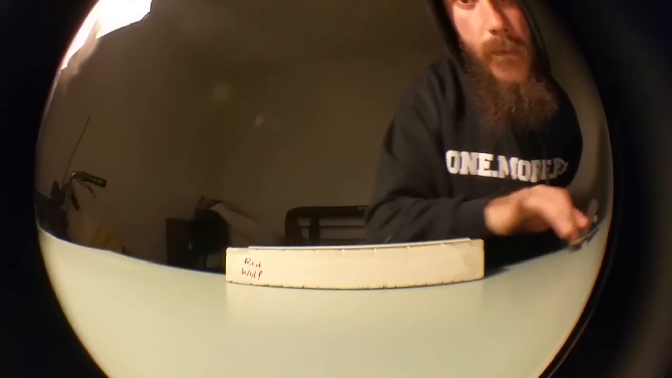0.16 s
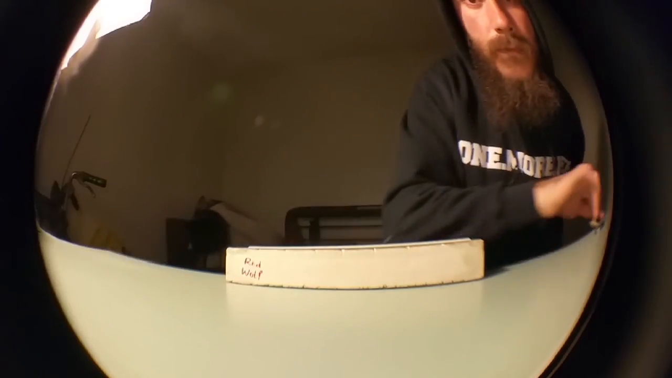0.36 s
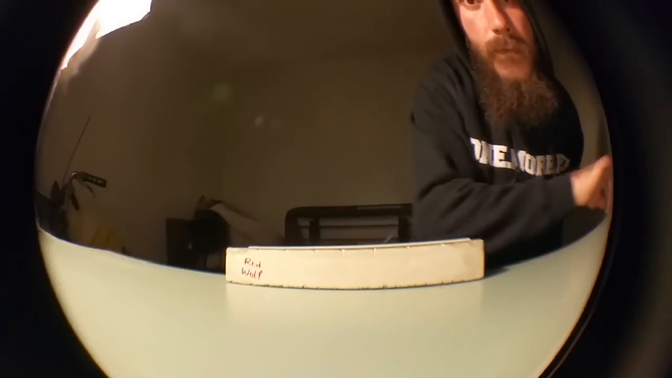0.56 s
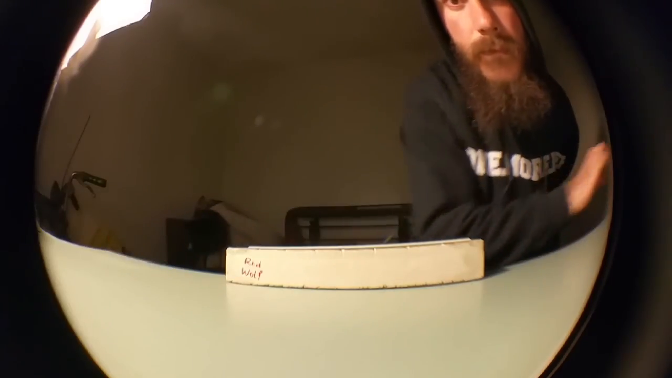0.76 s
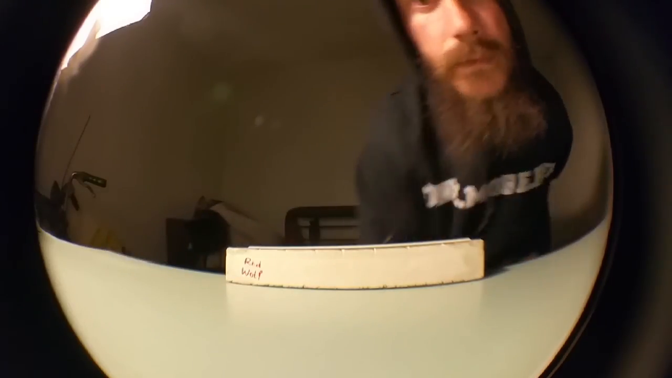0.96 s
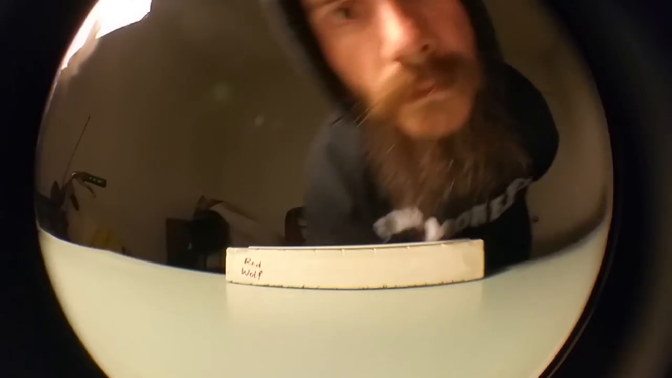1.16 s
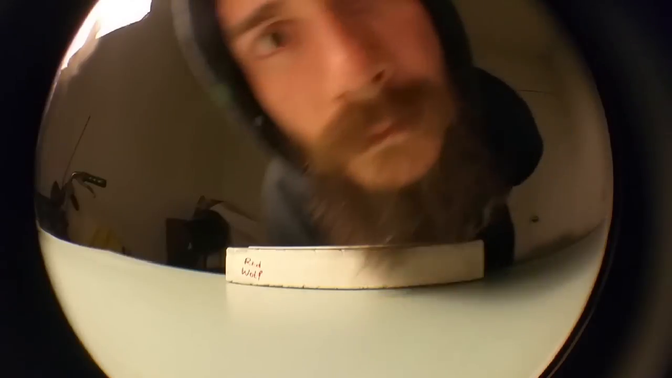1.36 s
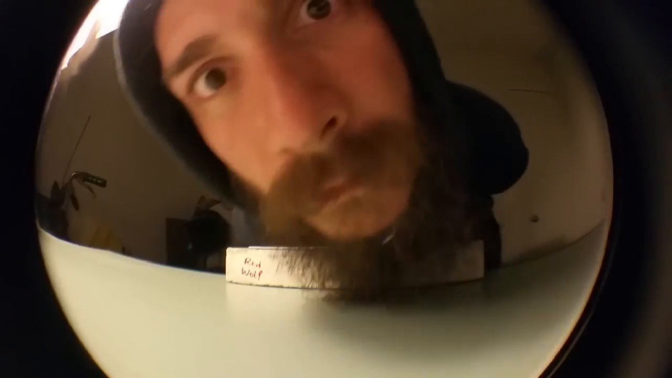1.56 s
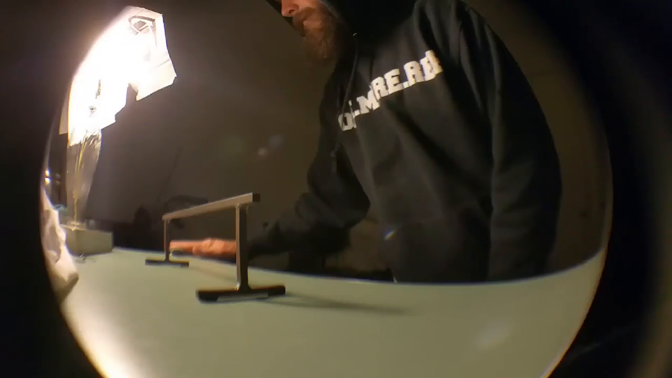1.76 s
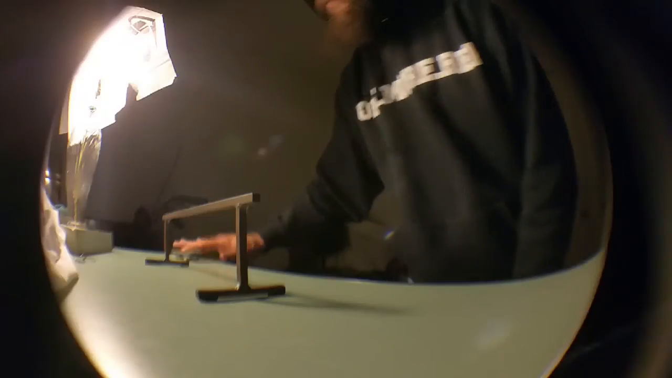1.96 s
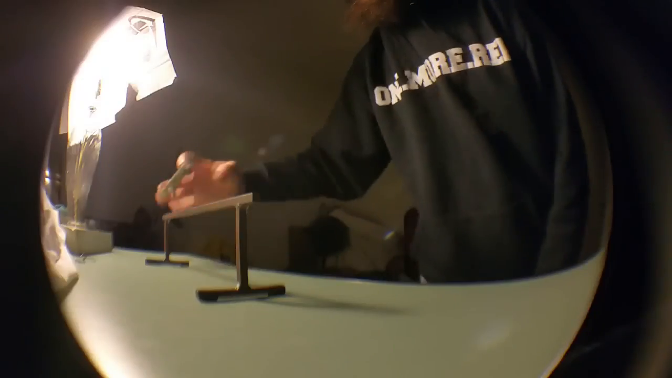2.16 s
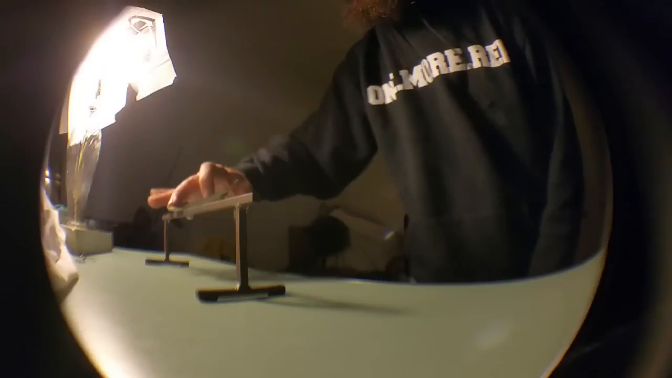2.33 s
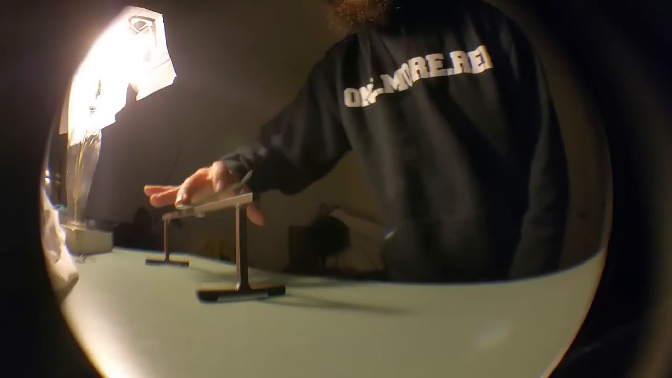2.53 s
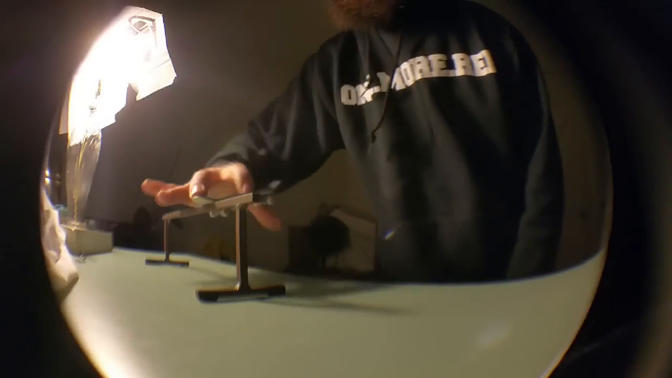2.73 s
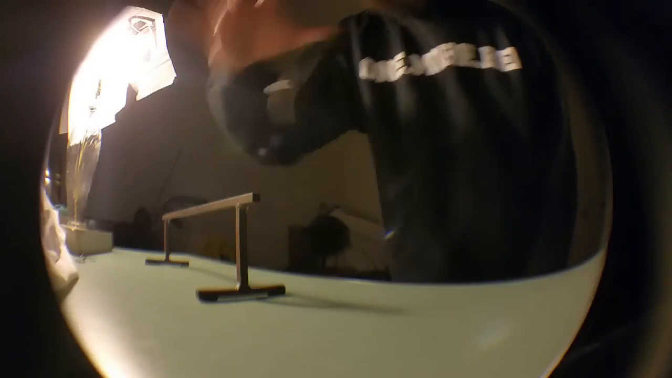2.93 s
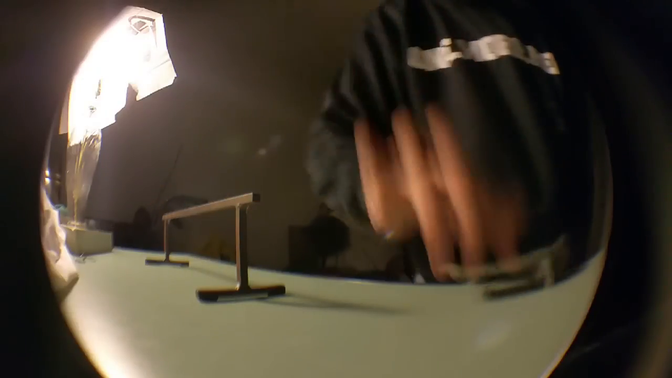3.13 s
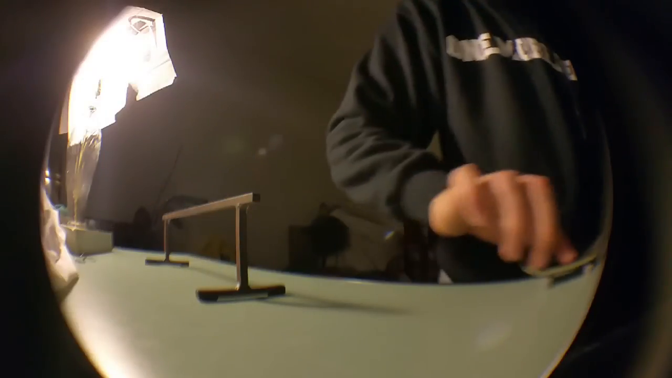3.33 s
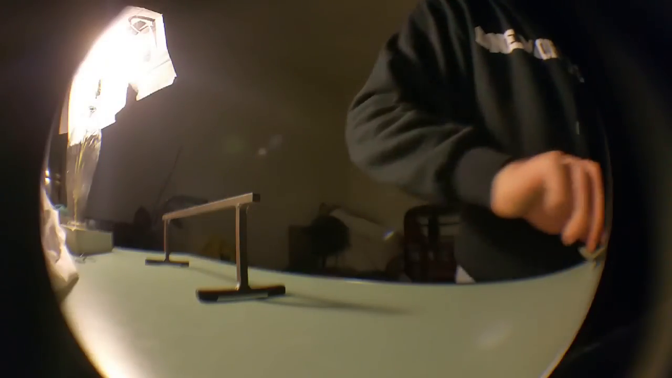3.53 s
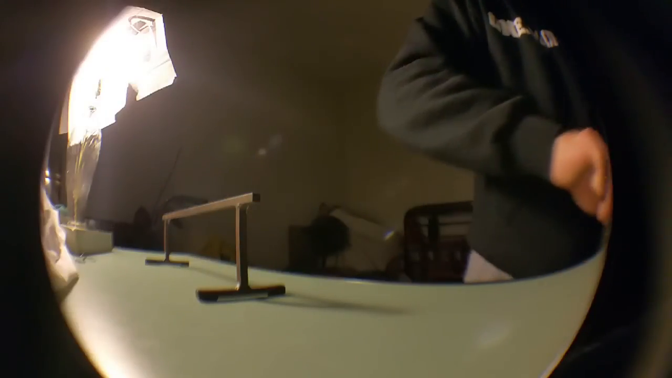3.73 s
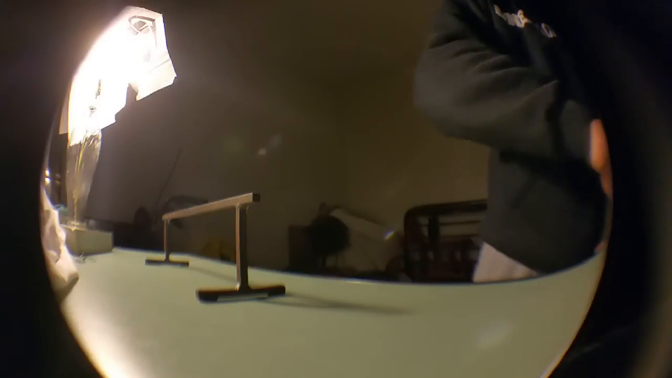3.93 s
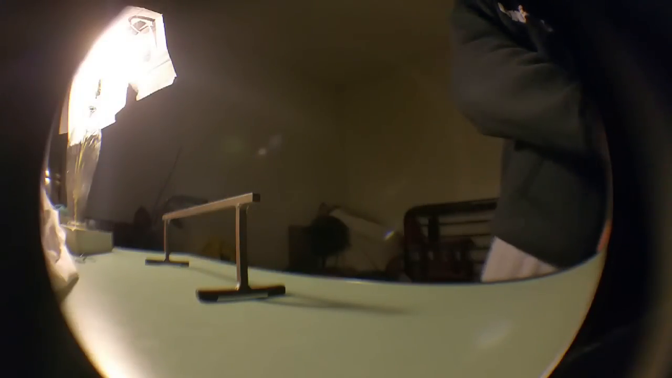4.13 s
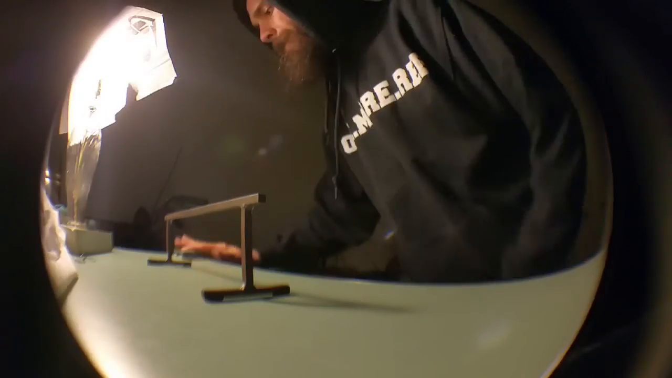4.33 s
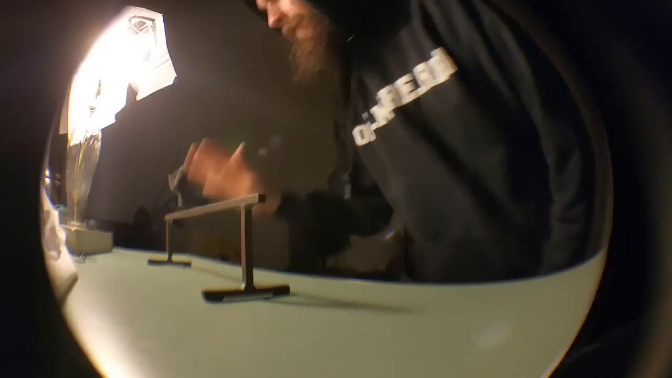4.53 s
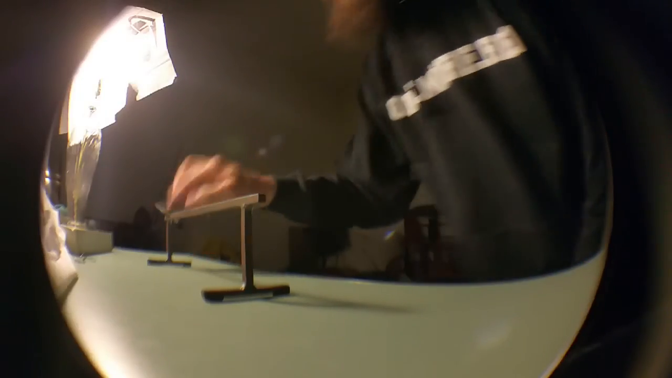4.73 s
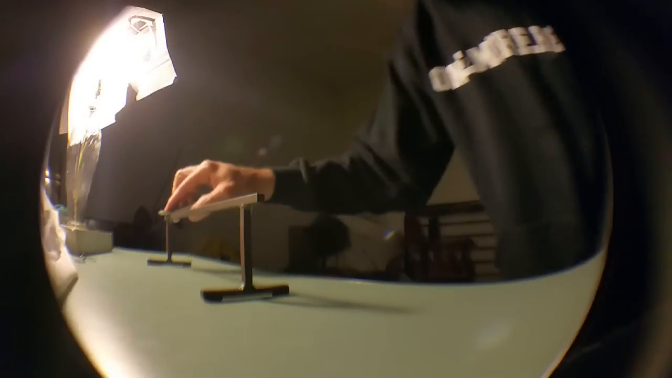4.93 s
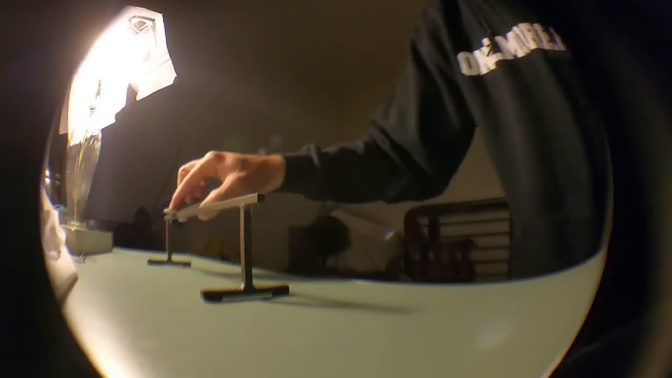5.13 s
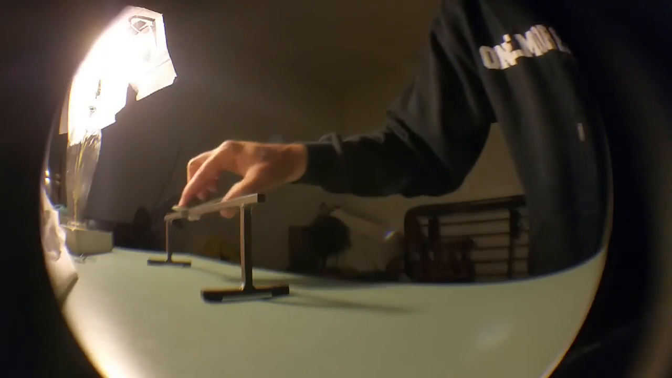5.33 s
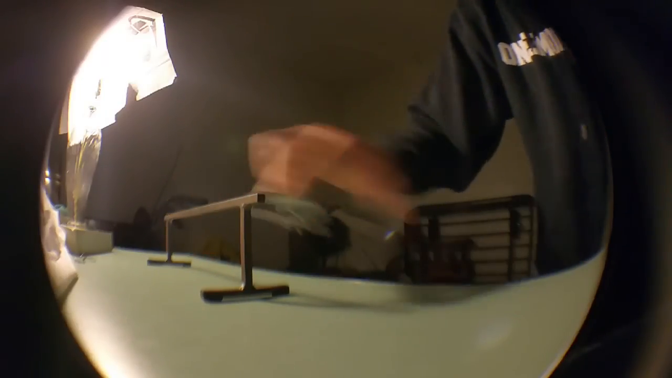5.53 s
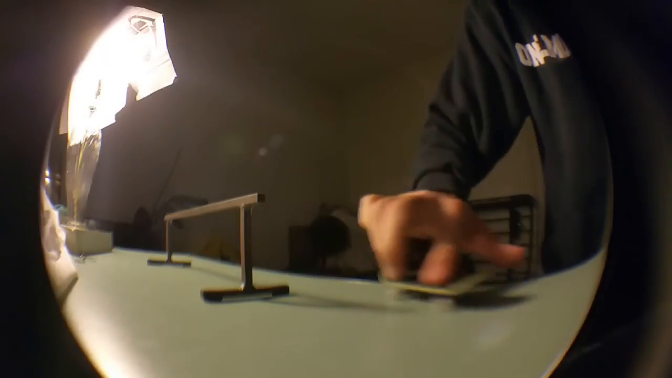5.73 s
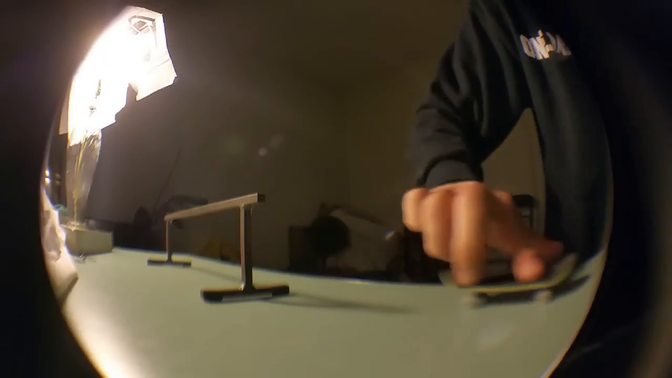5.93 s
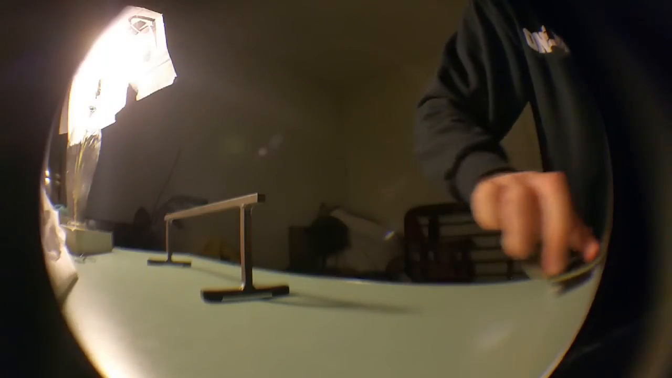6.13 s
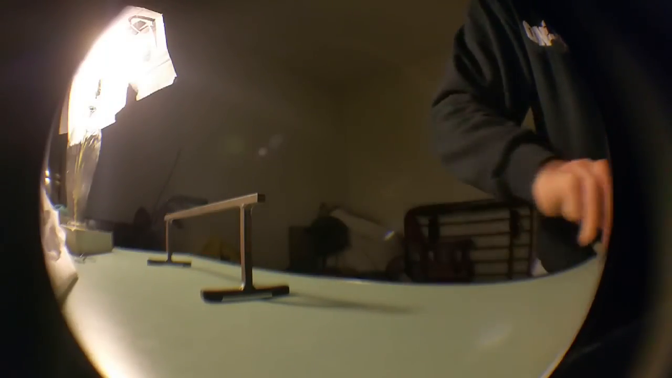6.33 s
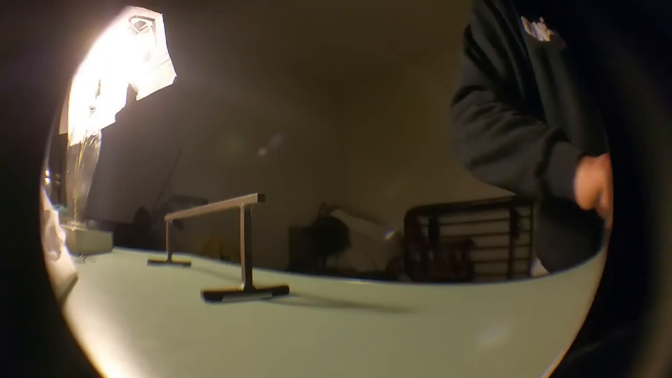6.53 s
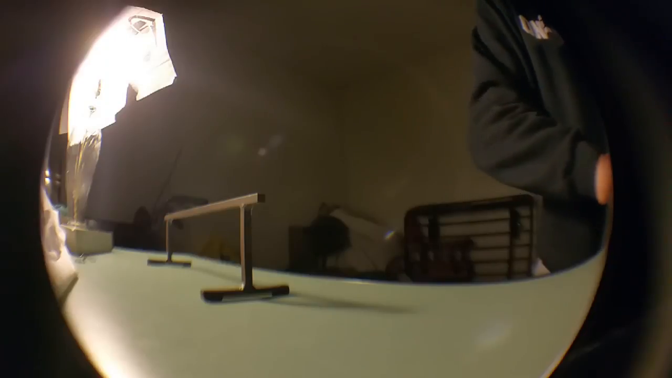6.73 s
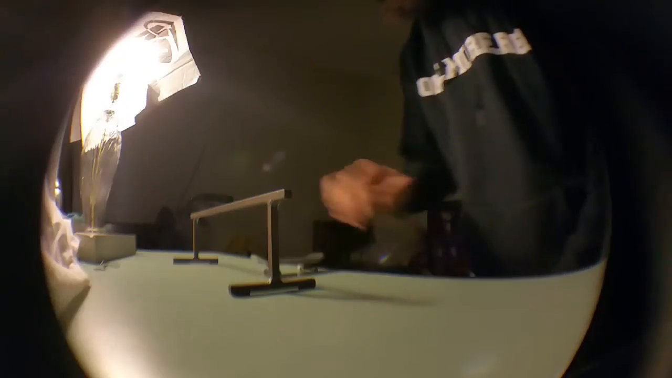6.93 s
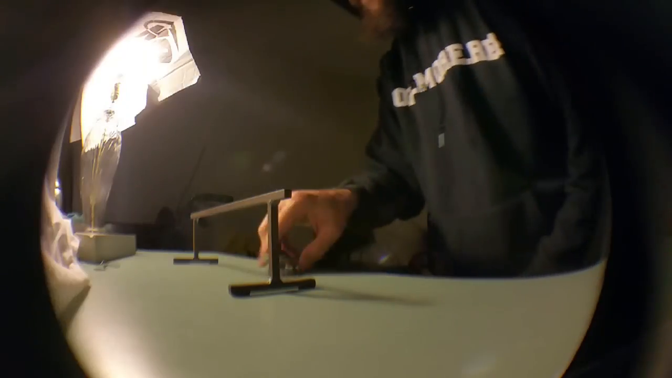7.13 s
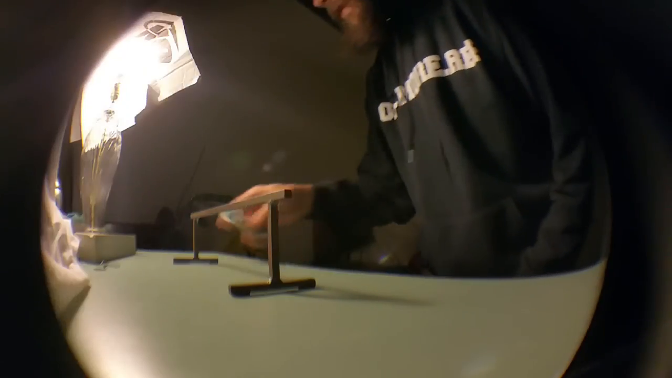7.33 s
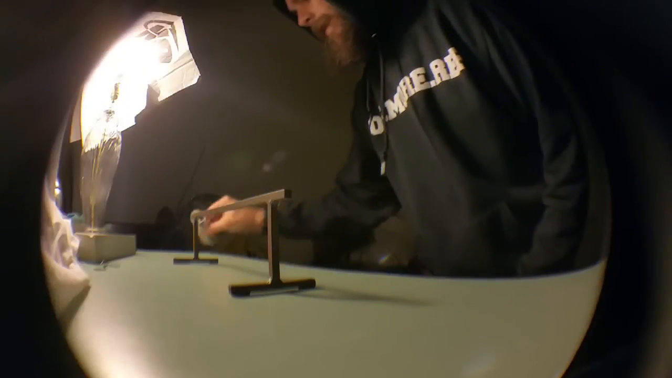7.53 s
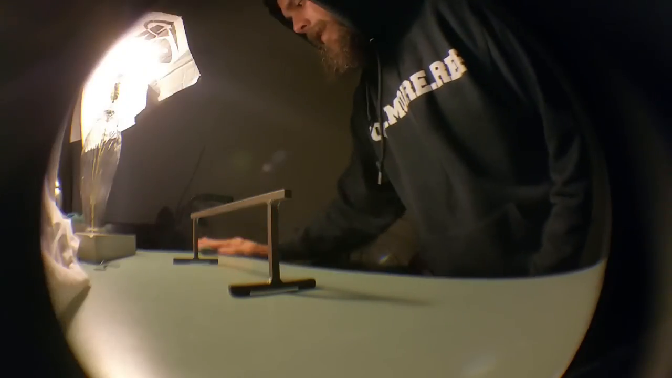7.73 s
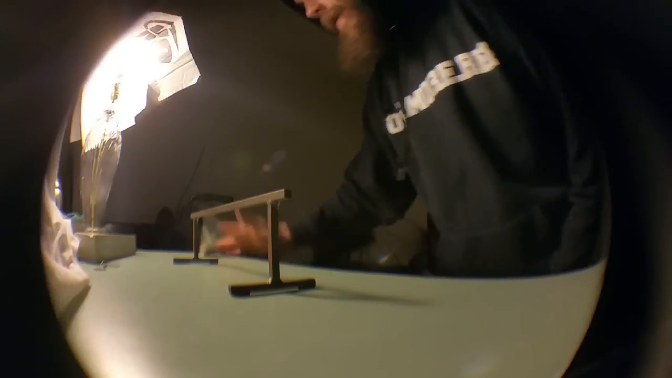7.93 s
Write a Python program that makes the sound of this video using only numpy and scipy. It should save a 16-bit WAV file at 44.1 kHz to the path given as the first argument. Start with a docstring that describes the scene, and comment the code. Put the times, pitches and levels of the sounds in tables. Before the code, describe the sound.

Two microphones lying on the table catch a miniature skateboard: dry snaps with woody deck knocks and table thumps, low drumming of tiny wheels with crunchy grit, short finger scuffs and faint rail ring. Four attempts are joined by hard cuts that chop the room tails. Rolling fades toward the right; the last attempt stops right after a pop, over quiet murmur and hiss.

```python
"""A finger-sized skateboard rolls on a tabletop, pops, lands on a small steel rail and drops back, in four attempts
joined end to end. Noise with random specks drums table and deck and crunches as grit in wheels and axles.
Every contact is a snap with short chatter, a knock of the deck and a thump of the table; friction scuffs, and
rail and ledge ring as decaying sines. Two spaced microphones lie on the table in a small hard room, where
decaying noise makes the reflections and a low murmur with treble hiss makes the hush."""
import sys
import numpy as np
from scipy import signal
from scipy.fft import rfft, irfft, next_fast_len
from scipy.io import wavfile
from scipy.ndimage import uniform_filter1d, map_coordinates

SR = 44100
rng = np.random.default_rng(int(sys.argv[2]) if len(sys.argv) > 2 else 0)


def waveform_to_disk(signal):
    """Save audio, clipped to [-1, 1], as 16-bit WAV at the path in sys.argv[1]."""
    frames = np.transpose(np.atleast_2d(signal))
    scaled = np.clip(frames, -1, 1) * 32767
    samples = np.round(scaled).astype(np.int16)
    wavfile.write(sys.argv[1], SR, samples)


N = 356306

# starts of the attempts and the end [t/s]
ATTEMPT_EDGES = [0, 1.65, 4.194, 6.865, 8.1]
# where the board is [t/s, delay of the left microphone/ms]
BOARD_PLACE = [(0, -.07), (.14, 0.26), (.3, 0.44), (1.36, 0.47), (1.42, -0.0097), (1.7, -0.229),
               (2.9, -0.24), (3.1, 0.35), (3.25, 0.15), (3.65, .45), (4.2, 0.43), (4.21, -.2),
               (5.55, -0.27), (5.67, 0.016), (6.15, 0.25), (6.4, 0.39), (6.86, 0.53), (6.87, 0.1),
               (7.2, -0.072), (8.08, -0.2)]

# Strokes: lists of curves [t/s, relative drumming level/dB, relative grit level/dB].
# wheels rolling away after a landing [t/s, drumming level/dB, grit level/dB]
ROLLS_AWAY = [
    [(.41, -48, -57.5), (.5, -42, -55.5), (.72, -42.5, -60), (.82, -52, -55), (.9, -46.5, -54),
     (1.08, -48.5, -59.5), (1.13, -42.5, -63), (1.19, -72, -81), (1.28, -56, -97)],
    [(3.28, -36.5, -50), (3.358, -44, -56), (3.462, -39, -52), (3.57, -42.5, -57), (3.7, -43.5, -52.5),
     (3.79, -41, -49.5), (3.952, -47.5, -56.5), (4.185, -46, -57)],
    [(5.73, -32, -35.5), (5.83, -39.5, -42), (5.946, -42.5, -51), (6.1, -43, -53), (6.356, -42.5, -49),
     (6.55, -44, -53.5), (6.7, -48, -59), (6.855, -48.5, -61.5)],
]
# the hard push that leads to a pop [t/s, drumming level/dB, grit level/dB]
POP_PUSHES = [
    [(1.8, -40.5, -60), (1.864, -42.5, -61.5), (1.94, -33, -49.5), (1.99, -28, -35.5), (2.02, -28, -45),
     (2.05, -50, -48), (2.085, -35.5, -42)],
    [(4.29, -51, -50), (4.334, -38, -51), (4.412, -28.5, -41.5), (4.436, -42, -73), (4.464, -37.5, -59),
     (4.49, -62, -42)],
    [(7.765, -33, -33), (7.79, -27, -43), (7.83, -31, -41.5), (7.907, -29.5, -36.5), (7.955, -45, -70),
     (7.975, -31, -58), (7.99, -71, -65)],
]
# the board rubbing along the rail [t/s, drumming level/dB, grit level/dB]
RAIL_GRINDS = [
    [(2.16, -52, -60), (2.218, -58, -55), (2.29, -62, -62), (2.31, -61, -55)],
    [(2.4, -45, -58), (2.488, -47, -62), (2.628, -46.5, -58.5), (2.698, -65, -62.5), (2.73, -46.5, -62.5),
     (2.892, -57, -58.5), (3.0, -78.5, -76.5)],
    [(4.93, -54, -58), (4.982, -60, -62.5), (5.204, -47.5, -63.5), (5.25, -65, -69), (5.574, -59.5, -60.5),
     (5.598, -82, -92), (5.63, -78, -78)],
]
# quiet rattles after hits, and fingers handling the board [t/s, drumming level/dB, grit level/dB]
RATTLES_AND_HANDLING = [
    [(0.0, -49, -38), (0.02, -54, -52), (0.028, -46, -38.5), (0.082, -71, -86), (0.1, -67, -73)],
    [(0.18, -41, -63), (0.206, -40.5, -52.5), (0.364, -49, -72), (0.4, -45, -62)],
    [(1.32, -58.5, -41), (1.378, -60.5, -84), (1.45, -68, -78), (1.53, -61, -59.5), (1.64, -57, -61.5)],
    [(1.67, -43, -73), (1.676, -54, -68), (1.694, -66.5, -69), (1.724, -38.5, -64), (1.735, -48, -65)],
    [(4.58, -57, -67), (4.644, -76, -69.5), (4.656, -64, -75), (4.662, -79.5, -81.5), (4.68, -83, -102)],
    [(7.17, -56, -55.5), (7.212, -50, -53), (7.23, -53, -53), (7.314, -66, -59), (7.69, -66, -72.5)],
    [(8.04, -50, -53), (8.062, -45, -55), (8.08, -56, -54)],
]
# mixes of each kind of stroke [tabletop, deck: level over drumming/dB; wheels, axles, fizz: level over grit/dB]
MIX_ROLL = (6, 0.5, -3.5, -2.5, -13)
MIX_FIRST_ROLL = (3, 4, 1, -3.5, -11.5)  # same columns: more deck and less tabletop
MIX_PUSH = (-5.5, 6.5, 2, -2.5, -8.5)  # same columns
MIX_GRIND = (-0.5, -2, -2, 2, 2)  # same columns
MIX_RATTLES_AND_HANDLING = (3.5, 0, -2.5, -1.5, -7.5)  # same columns
# how far each level follows the grit rather than the drumming [tabletop, deck, wheels, axles, fizz: share]
GRIT_SHARE = (0.0, .25, .85, 1.0, 1.05)
EDGE_S, OFF_DB = 0.015, -100  # each stroke fades in from this level and out to it

# resonances of the tabletop [f/Hz, width/Hz, level/dB]
TABLE_MODES = [(39, 33, -21.5), (61.6, 57, -9.5), (126, 37, -3), (161.7, 25, -0.5), (241.4, 59, -0.5),
               (294.8, 34.4, 1), (378.7, 42, 1), (480, 39, -0.5), (622.7, 39, -0.5), (696.6, 12, 2.5),
               (888, 100, -0.5)]
# resonances of the deck [f/Hz, width/Hz, level/dB]
DECK_MODES = [(598.4, 92, -3), (787.4, 86, -1), (995, 260, -3.5), (1106, 150, 0), (1297, 74, -1),
              (1476, 81, -4), (1694, 84, -8.5), (1870, 56, -7.5), (2005, 62, -6.5), (2117, 39, -15),
              (2340, 110, -10), (2980, 59, -10.5), (2985, 130, -16)]
# resonances of the wheels [f/Hz, width/Hz, level/dB]
WHEEL_MODES = [(1964, 760, -2.5), (2946, 535, 9), (3114, 740, 8), (3835, 665, 1)]
# resonances of the axles [f/Hz, width/Hz, level/dB]
AXLE_MODES = [(4780, 980, -1.5), (5648, 317, 6), (6045, 670, 1.5), (7420, 980, -4.5)]
# resonances of the highest treble [f/Hz, width/Hz, level/dB]
FIZZ_MODES = [(8940, 1800, 2), (11730, 900, 6), (12810, 2800, 2.5), (15800, 400, -19.5)]
# faint note while fingers turn the deck; the end levels hold [t/s, level/dB]
TURNING_NOTE = [(7.26, -104), (7.33, -66), (7.6, -72), (7.68, -75)]
TICKS_PER_S, FIZZ_TICK_DB, AXLE_TICK_DB = 110, 5, -2  # small random ticks in fizz and axles

# contacts of wheels, tail and axles, before the resonances; all but the first level are relative to it
# [t/s, level/dB, thump level/dB, knock level/dB, knock f/Hz, brightness level/dB]
BOARD_CONTACTS = [(0.0265, -25.5, -5.5, -25, 2130, -17), (0.127, -26.5, -1.5, -12, 1880, -8),
                  (0.14, -8.5, -9.5, -20, 830, -15), (0.1544, -17.5, -17.5, -5, 840, -11.5),
                  (0.7771, -43.5, -10, 10.5, 2350, -27), (.829, -24, -7, -10.5, 2110, -13),
                  (0.8616, -42.5, 1, 5.5, 2170, -23), (1.0938, -26.5, -18.5, -5, 2000, -12.5),
                  (1.1089, -39.5, 10.5, 7, 850, -23), (1.3109, -38, -3, -28, 2370, -1),
                  (2.0973, -8.5, -16.5, -15.5, 796, -14), (2.3234, -15, -3, -41, 2470, -13.5),
                  (2.3344, -16, -6.5, -7, 840, -6.5), (3.2004, -24, 1, -27, 1400, -16),
                  (3.203, -6, -13, -7, 593, -13.5), (3.2274, -17.5, -1.5, -26.5, 820, -8),
                  (3.235, -12, -14.5, -10.5, 975, -13), (3.2372, -14, -15.5, -12.5, 950, -17),
                  (3.258, -32.5, -15, 4, 865, -21), (4.2243, -21.5, -35, -8, 1830, -9),
                  (4.2533, -13, -11, -0.5, 2030, -10.5), (4.5014, -12, -14.5, -16, 1440, -13),
                  (4.785, -10, -4.5, -20, 844, -17.5), (4.8207, -7.5, -9, -22, 800, -21.5),
                  (4.8631, -26.5, 6, -5.5, 786, -17), (4.8704, -43, -3.5, -26, 842, -12),
                  (5.395, -60.5, 17.5, -20.5, 880, -24), (5.4995, -46.5, 3.5, -10.5, 2200, -13),
                  (5.5647, -46, -30, -4.5, 1290, -17), (5.6659, -15.5, -11.5, -10, 2350, -8),
                  (5.6735, -4.5, -14, -11, 616, -16.5), (5.6773, -11.5, -10, -6, 990, -17.5),
                  (7.1408, -40.5, 5.5, -10, 802, -9.5), (7.1454, -22.5, -4, -10.5, 2010, -18),
                  (7.1574, -36.5, -7, 9.5, 2310, -15), (7.269, -34.5, -21, -30, 2340, -10.5),
                  (7.5076, -47.5, -3, -21.5, 1870, -10), (7.7109, -17.5, -21, -12, 2060, -15),
                  (7.7422, -5.5, -30, -10, 890, -13.5), (8.0056, -9, -12.5, -14, 784, -11)]
# loud specks under the wheels, before the resonances [t/s, level/dB]
WHEEL_SPECKS = [(3.5934, -34), (3.6385, -35.5), (3.6656, -39.5), (3.7, -47), (3.718, -33.5), (3.761, -34),
                (3.799, -41), (3.8166, -41), (4.0692, -37.5), (5.9574, -31.5), (6.055, -38), (6.144, -35),
                (6.3013, -37), (6.37, -32), (6.441, -33), (6.612, -35), (6.6706, -47), (6.717, -46)]
CHATTER_T60_S, SPECK_T60_S = 0.012, 0.0033
SNAP_S = 0.0011  # the chatter builds up this long before the snap
PAN_DB_PER_MS, PAN_SCATTER_DB = -24, 5  # a contact leans to the nearer microphone

# ring of the ledge as the board leaves it [f/Hz, level/dB, t60/s]
LEDGE_MODES = [(2200, -33, 0.1), (3060, -42, .07)]
LEDGE_S = 0.029
# short scuffs of the deck under the fingers, before the resonances [t/s, relative level/dB, length/s]
DECK_SCUFFS = [(1.649, -44, 0.027), (1.742, -23.5, 0.022), (1.766, -19.5, 0.019), (2.06, -23.5, 0.026),
               (2.43, -39, 0.023), (2.585, -39, 0.025), (2.624, -37.5, 0.022), (2.709, -38, 0.022),
               (2.735, -37.5, 0.064), (4.317, -26, 0.03), (5.171, -39.5, 0.033), (7.05, -65, .03),
               (7.085, -59.5, .03), (7.19, -48, 0.04), (7.221, -38, 0.021)]
# steel ring of the rail [f/Hz, t60/s]
RAIL_MODES = [(3770, 1), (4950, 1), (7050, 0.44), (8600, 0.27)]
# touches on the rail [t/s, level/dB, f that the spot favours/Hz]
RAIL_TOUCHES = [(2.874, -65.5, 3944), (4.821, -62, 8680), (4.93, -64.5, 4950), (5.58, -82.5, 6840)]

# room decay and reflections [f/Hz, t60/s, level/dB]
ROOM_WALLS = [(100, 0.41, -4.5), (705, 0.18, 1), (4800, 0.27, -7.5), (13120, 0.2, -4.5)]
# balance of the reflections [f/Hz, left over right level/dB]
ROOM_LEAN = [(60, 0.5), (200, 4), (600, 0.5), (4000, -5)]
# left-right likeness of diffuse sound [f/Hz, likeness]
DIFFUSE_LIKENESS = [(60, 1), (130, 0.58), (300, 0.61), (700, 0.079), (2000, 0.18)]
# spectrum of the hush [f/Hz, relative level per Hz/dB]
HUSH_SPECTRUM = [(15, -22), (25, -1.5), (105, 0.5), (250, -10.5), (416, -14.5), (695, -24.5), (2000, -35.5),
                 (16000, -33.5)]
# gain on the treble of the hush in each attempt [level/dB]
HISS_GAINS = [4.5, 1, 2, -6.5]
AIR_DB, HISS_HZ = -58.5, 700  # hush level before the treble gain, and where that treble starts
TOP_HZ = 16000  # band limit


def amp(db):
    """Gain of a level in dB."""
    return 10 ** (np.asarray(db) / 20)


def unit(x):
    """x at rms 1."""
    return x / np.sqrt(np.mean(x ** 2) + 1e-20)


def along(points, hz, column=1):
    """A column of (Hz, value, ..) points, read on a log frequency axis."""
    point_hz, *values = np.transpose(points)
    return np.interp(np.log(hz + 1), np.log(point_hz + 1), values[column - 1])


def curves(rows):
    """One value per sample for each column after the time."""
    s, *columns = np.transpose(rows)
    return [np.interp(np.arange(N) / SR, s, column) for column in columns]


def wobble(rate):
    """A smooth random curve with rate knots a second."""
    knots = rng.standard_normal(int(N * rate / SR) + 4)
    return map_coordinates(knots, [np.arange(N) * rate / SR])


def lean(db):
    """Left and right gains of a balance; positive leans left."""
    return amp([db / 2, -db / 2])


def filtered(x, response):
    """x shaped by a complex response of frequency."""
    n = x.shape[-1]
    size = next_fast_len(n + 8192)
    spectrum = rfft(x, size) * response(np.fft.rfftfreq(size, 1 / SR))
    return irfft(spectrum, size)[..., :n]


def body(modes):
    """Causal response of a set of damped resonances, alternating in polarity."""
    def response(f):
        total = 0
        for k, (hz, width, db) in enumerate(modes):
            resonance = width * 1j * f / (hz * hz - f * f + width * 1j * f)
            total = total + (-1) ** k * amp(db) * resonance
        return total
    return response


def diffuse(size, colour):
    """Two coloured noises whose left-right likeness depends on frequency, from shared mid and side parts."""
    def split(hz):
        angle = np.arccos(np.clip(along(DIFFUSE_LIKENESS, hz), -1, 1)) / 2
        return colour(hz) * [np.cos(angle), np.sin(angle)]
    mid, side = filtered(rng.standard_normal((2, size)), split)
    return np.array([mid + side, mid - side])


def bumps(rate, spread_db, share):
    """A rough surface: steady noise plus a share of specks of uneven size, rate a second."""
    sizes = amp(spread_db * np.minimum(rng.exponential(size=N), 3.5))
    specks = (rng.random(N) < rate / SR) * sizes
    burst = np.exp(-np.arange(80) / 11)
    crackle = signal.fftconvolve(specks, burst)[:N] * rng.standard_normal(N)
    return rng.standard_normal(N) + share * unit(crackle)


def strokes():
    """Levels of table, deck, wheels, axles and fizz: the power of all strokes, each kind with its own mix."""
    power, t = 0, np.arange(0, N / SR + 0.002, 0.002)
    kinds = [(ROLLS_AWAY[:1], MIX_FIRST_ROLL), (ROLLS_AWAY[1:], MIX_ROLL), (POP_PUSHES, MIX_PUSH),
             (RAIL_GRINDS, MIX_GRIND), (RATTLES_AND_HANDLING, MIX_RATTLES_AND_HANDLING)]
    for kind, mix in kinds:
        for rows in kind:
            fade_in = (rows[0][0] - EDGE_S, OFF_DB, OFF_DB)
            fade_out = (rows[-1][0] + EDGE_S, OFF_DB, OFF_DB)
            s, *columns = np.transpose([fade_in, *rows, fade_out])
            drum_db, grit_db = (np.interp(t, s, column) for column in columns)
            level_db = np.array(mix)[:, None] + drum_db + np.outer(GRIT_SHARE, grit_db - drum_db)
            power = power + amp(level_db) ** 2
    return curves(np.column_stack([t, 10 * np.log10(power).T]))


def rolling():
    """The rough surface shakes table, deck, wheels and axles; grit crackles most near the right microphone."""
    table_db, deck_db, wheel_db, axle_db, fizz_db = strokes()
    delay_ms, = curves(BOARD_PLACE)
    lumps = wobble(70)

    table_noise = unit(filtered(bumps(300, 3.0, share=0.64), body(TABLE_MODES)))
    table = amp(table_db - 7 + 0.3 * lumps) * table_noise
    deck_noise = unit(filtered(bumps(400, 2.2, share=0.63), body(DECK_MODES)))
    deck = amp(deck_db - 4 + 1.1 * lumps) * deck_noise

    grit = bumps(230, 2.4, share=0.8 + 2.8 * np.clip(delay_ms, 0, 1))
    wheels = amp(wheel_db - 1.5 + 1.4 * lumps) * unit(filtered(grit, body(WHEEL_MODES)))
    ticks = (rng.random(N) < TICKS_PER_S / SR) * rng.standard_normal(N)
    ticks = unit(ticks * np.clip(delay_ms + 0.1, 0, 0.35))
    axle_drive = unit(grit) + amp(AXLE_TICK_DB) * ticks
    axles = amp(axle_db - 3) * unit(filtered(axle_drive, body(AXLE_MODES)))

    # the hardest specks carry most of the highest treble
    hardest = unit(grit * np.abs(grit) ** 0.55) + amp(FIZZ_TICK_DB) * ticks
    fizz_response = lambda f: body(FIZZ_MODES)(f) * f ** 4 / (f ** 4 + 1600.0 ** 4)
    fizz = amp(fizz_db - 2) * unit(filtered(hardest, fizz_response))

    note_noise = unit(filtered(rng.standard_normal(N), body([(1880, 180, 0)])))
    note = amp(curves(TURNING_NOTE)[0]) * note_noise
    drone = table * lean(2.5)[:, None] + (deck + note) * lean(-4 * delay_ms)
    return drone, (wheels + axles + fizz) * lean(-14 * delay_ms)


def hush():
    """The quiet room: a low murmur of air, and a treble hiss that differs between attempts."""
    air_noise = unit(diffuse(N, lambda hz: amp(along(HUSH_SPECTRUM, hz))))
    air = amp(AIR_DB + 0.5 * wobble(19)) * air_noise
    hiss = filtered(air, lambda hz: hz ** 2 / (hz ** 2 + HISS_HZ ** 2))
    attempt = np.searchsorted(ATTEMPT_EDGES, np.arange(N) / SR, side="right") - 1
    return air - hiss + amp(np.take(HISS_GAINS, attempt)) * hiss


def knocked(db, spot_hz):
    """The deck rings as decaying sines, loudest in the modes that the struck spot favours."""
    t = np.arange(SR // 12) / SR
    ring = 0
    for hz, width, level_db in DECK_MODES:
        favour_db = -40 * abs(np.log(hz / spot_hz))
        decay = np.exp(-np.pi * 1.5 * width * t)
        ring = ring + amp(level_db + favour_db) * decay * np.sin(2 * np.pi * hz * t)
    return amp(db) * ring


def contacts():
    """Each contact is a snap with chatter in wheels and axles, a deck knock and a soft push into the table."""
    push, knock, hard, bright = np.zeros((4, 2, N + SR // 10))
    t = np.arange(SR // 40) / SR
    rows = [(*row, CHATTER_T60_S) for row in BOARD_CONTACTS]
    rows += [(s, db, -40, -20, 2000, -7, SPECK_T60_S) for s, db in WHEEL_SPECKS]
    delay_ms, = curves(BOARD_PLACE)
    for s, db, thump_db, knock_db, knock_hz, bright_db, t60 in rows:
        start = round(s * SR)
        at = slice(start, start + len(t))
        pan_db = PAN_DB_PER_MS * delay_ms[start] + PAN_SCATTER_DB * rng.standard_normal()

        chatter = rng.standard_normal(len(t)) * (1 - np.exp(-t / 0.00077)) * amp(-60 * t / t60)
        chatter[round(SNAP_S * SR)] = 3.6  # the snap
        chatter = amp(db) * chatter / np.abs(chatter).max() * lean(pan_db)[:, None]
        hard[:, at] += chatter
        bright[:, at] += amp(bright_db) * chatter

        ring = knocked(db + knock_db + 5.5, knock_hz) * lean(pan_db / 2)[:, None]
        knock[:, start:start + ring.shape[1]] += ring
        blow = t / 0.00046 * np.exp(-t / 0.00033) * rng.choice([-1, 1])
        push[:, at] += amp(db + thump_db) * blow * lean(3.2)[:, None]

    metal = lambda f: amp(18) * body(WHEEL_MODES)(f) - amp(13.5) * body(AXLE_MODES)(f)
    clack = filtered(hard, metal) + knock + amp(17.5) * filtered(bright, body(FIZZ_MODES))
    thump = amp(20) * filtered(push, body(TABLE_MODES))
    return (clack + thump)[:, :N]


def ledge():
    """The ledge gives a short clear ring of decaying sines as the board leaves it."""
    out, t = np.zeros(N), np.arange(SR // 4) / SR
    ring = sum(amp(db - 60 * t / t60) * np.sin(2 * np.pi * hz * t) for hz, db, t60 in LEDGE_MODES)
    out[round(LEDGE_S * SR):][:len(t)] = ring * (1 - np.exp(-t / 0.008))
    return out


def scuffs():
    """Grainy bursts of friction in the deck: a quick start and a slower end."""
    stroke = np.zeros(N + SR)
    for s, db, length in DECK_SCUFFS:
        progress = np.arange(round(length * SR)) / (length * SR)
        stroke[round(s * SR):][:len(progress)] += amp(db - 7) * np.sin(np.pi * progress ** 0.25)
    rubbing = stroke[:N] * bumps(820, 1.8, share=0.61)
    grain = filtered(rubbing, body(DECK_MODES + [(2310, 780, -15.5)]))
    return amp(15.5) * grain * lean(7)[:, None]


def rail():
    """The steel bar rings faintly when the axles touch it; the spot decides which mode sings."""
    out, t = np.zeros(N + SR), np.arange(SR) / SR
    for s, db, spot_hz in RAIL_TOUCHES:
        ring = 0
        for hz, t60 in RAIL_MODES:
            favour_db = -70 * abs(np.log(hz / spot_hz))
            ring = ring + amp(favour_db - 60 * t / t60) * np.sin(2 * np.pi * hz * t)
        out[round(s * SR):][:SR] += amp(db) * ring * (1 - np.exp(-t / 0.01))
    return out[:N]


def spaced(x):
    """The sound reaches the nearer microphone first: half the delay moves each channel its own way."""
    half = curves(BOARD_PLACE)[0] * SR / 2000  # samples
    left = map_coordinates(x[0], [np.arange(N) - half])
    right = map_coordinates(x[1], [np.arange(N) + half])
    return np.array([left, right])


def room(x):
    """Reflections as decaying noise, drawn anew each quarter second; they stop where an attempt ends."""
    out, step, size = np.zeros((2, N + 2 * SR)), SR // 4, SR // 3
    for start, end in zip(ATTEMPT_EDGES, ATTEMPT_EDGES[1:]):
        stop = round(end * SR)
        for i in range(round(start * SR), min(stop, N), step):
            hz, t, z = signal.stft(diffuse(size, np.ones_like), SR, nperseg=256)
            decay = amp(-60 * t / along(ROOM_WALLS, hz)[:, None])
            tail = signal.istft(z * decay, SR, nperseg=256)[1]
            tail *= 1 - np.exp(-(np.arange(tail.shape[1]) / SR / 0.00067) ** 2)  # a soft, quick onset
            tail /= np.linalg.norm(tail[0])
            piece = x[None, i:min(i + step, stop)]
            wet = signal.fftconvolve(piece, tail, axes=1)[:, :stop - i]
            out[:, i:i + wet.shape[1]] += wet
    colour = lambda hz: amp(along(ROOM_WALLS, hz, column=2)) * lean(along(ROOM_LEAN, hz))
    return filtered(out[:, :N], colour)


def wash(x):
    """The diffuse field of the grit: its energy lingers by band and sets the level of two-channel noise."""
    hz, t, z = signal.stft(x, SR, nperseg=1024, noverlap=768)
    keep = amp(-60 * t[1] / along(ROOM_WALLS, hz)) ** 2
    energy, held = np.zeros(z.shape), 0
    for i in range(1, len(t)):
        held = held * keep + (1 - keep) * np.abs(z[:, i - 1]) ** 2
        same_attempt = np.searchsorted(ATTEMPT_EDGES, t[i]) == np.searchsorted(ATTEMPT_EDGES, t[i - 1])
        held = held * same_attempt  # silenced where an attempt ends
        energy[:, i] = held
    field = signal.stft(diffuse(N, np.ones_like), SR, nperseg=1024, noverlap=768)[2]
    level = np.sqrt(uniform_filter1d(energy, size=3, axis=0)) * lean(along(ROOM_LEAN, hz))[..., None]
    shaped = unit(field.real) * level + 1j * unit(field.imag) * level
    return signal.istft(shaped, SR, nperseg=1024, noverlap=768)[1][:, :N]


def scene():
    """Direct sound, reflections and the hush of the room."""
    drone, grit = rolling()
    hits = contacts() + scuffs() + rail() + ledge()
    reflections = room(amp(0.5) * drone.mean(0) + amp(-0.5) * hits.mean(0))
    echoes = reflections + amp(-2.5) * wash(grit.mean(0))
    return spaced(drone + grit + hits) + echoes + hush()


def record(dry):
    """The loudest peaks round off below full scale, then a steep filter cuts above the band limit."""
    rounded = dry / (1 + np.abs(dry / 0.92) ** 6) ** (1 / 6)
    return filtered(rounded, lambda hz: 1 / (1 + (hz / TOP_HZ) ** 90))


dry = scene()
out = record(dry)
waveform_to_disk(out)
```